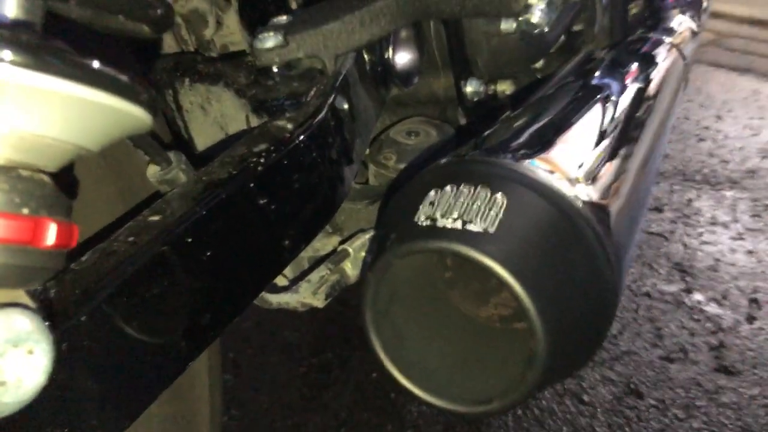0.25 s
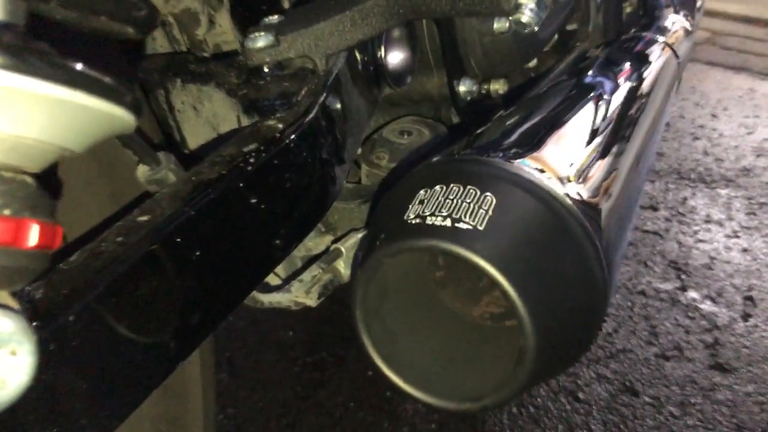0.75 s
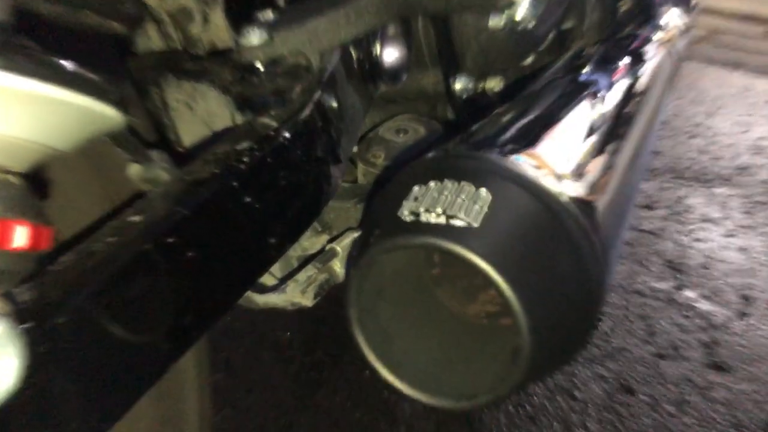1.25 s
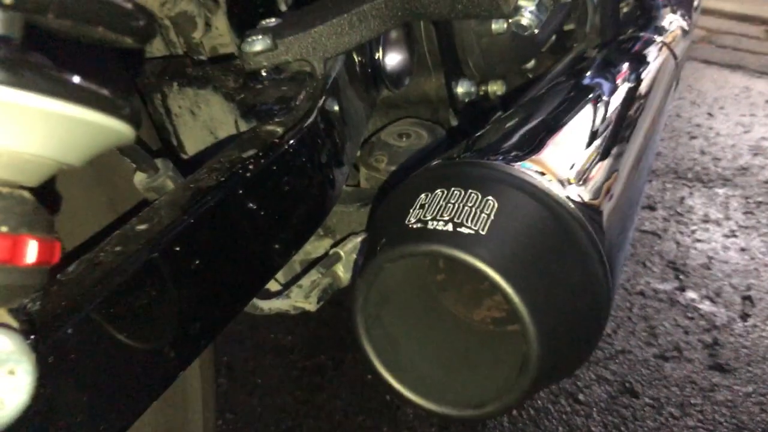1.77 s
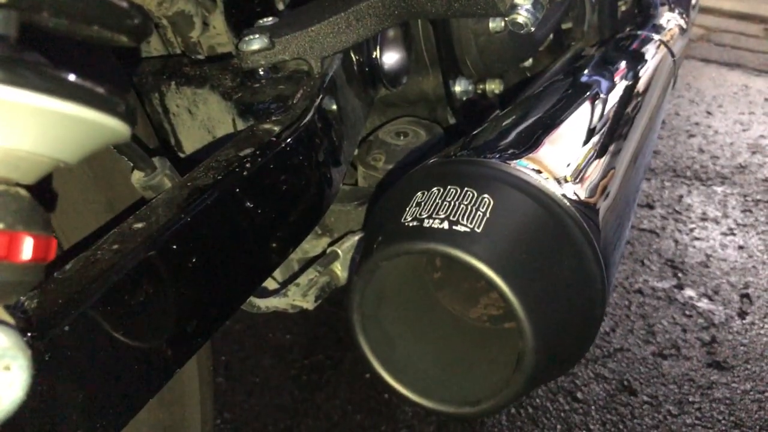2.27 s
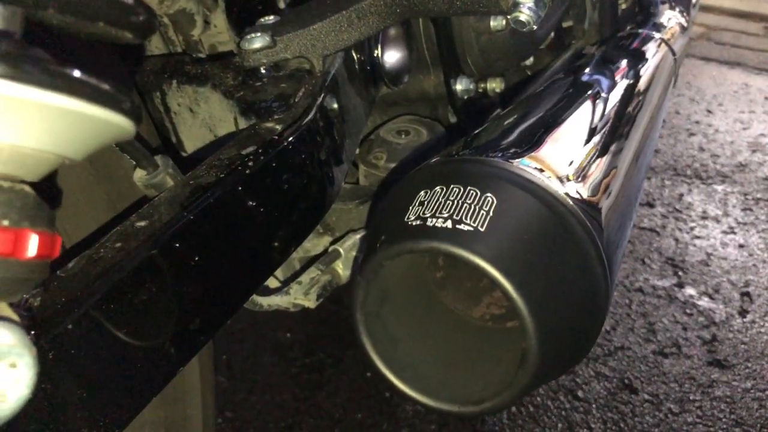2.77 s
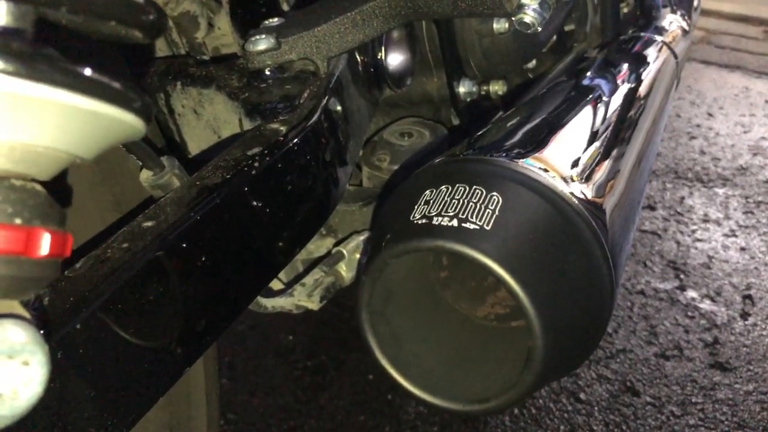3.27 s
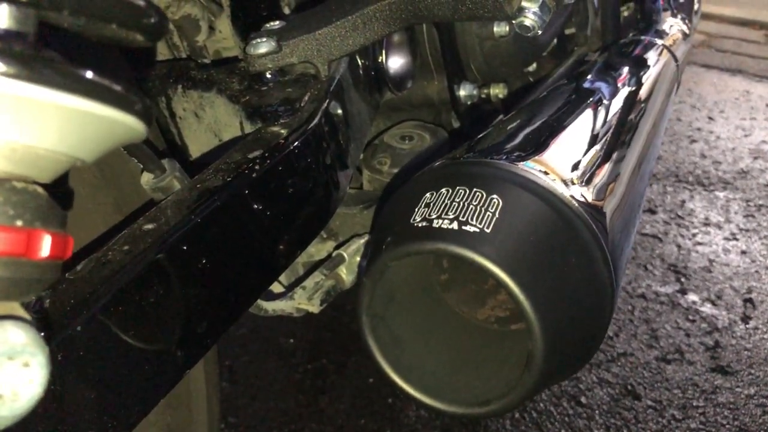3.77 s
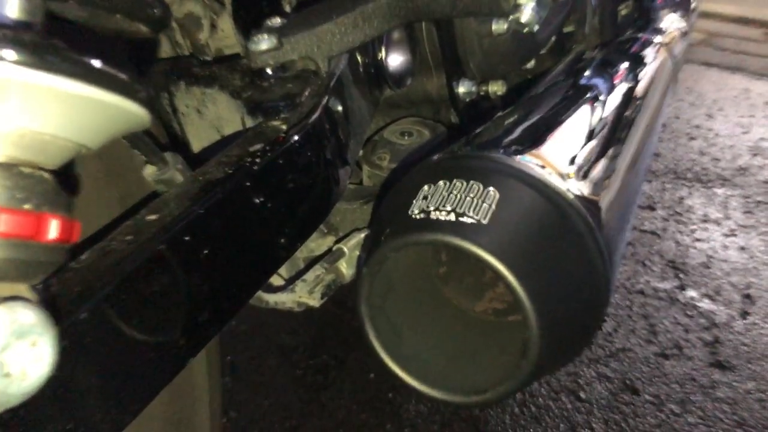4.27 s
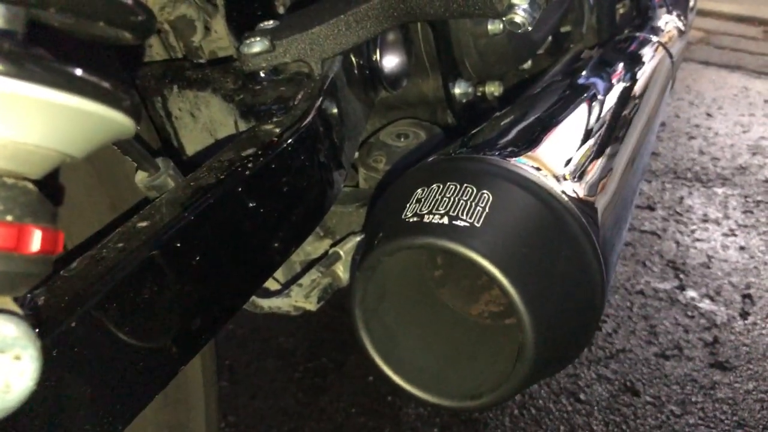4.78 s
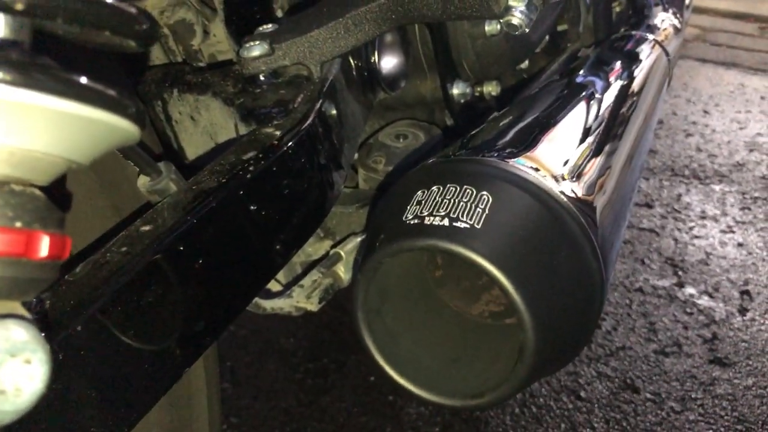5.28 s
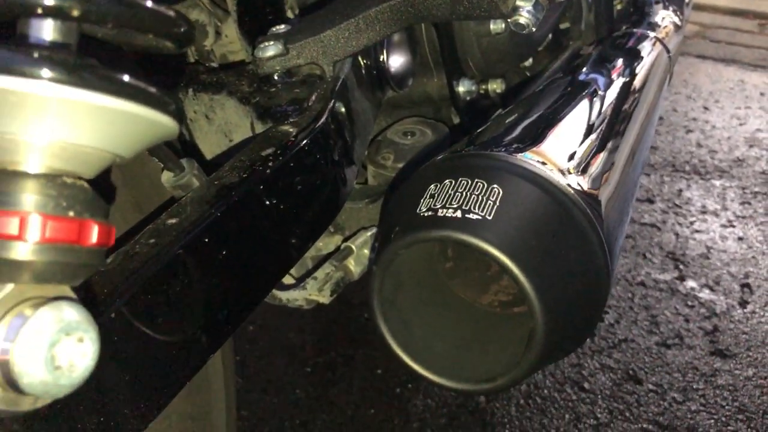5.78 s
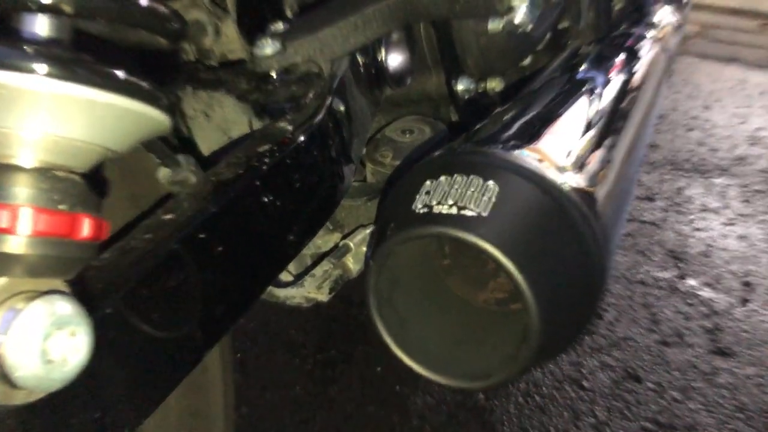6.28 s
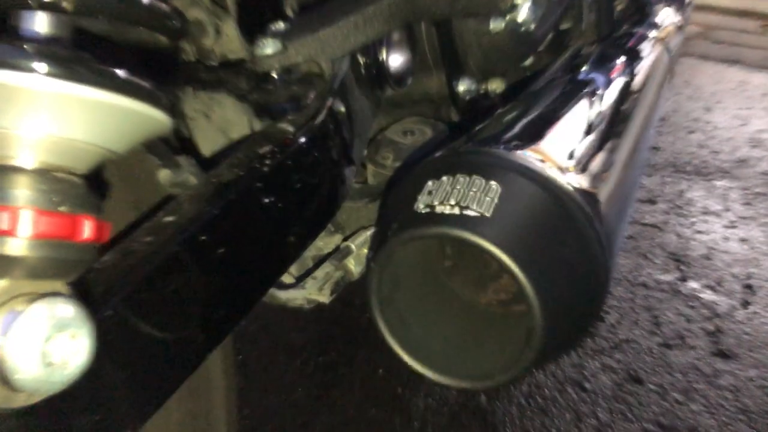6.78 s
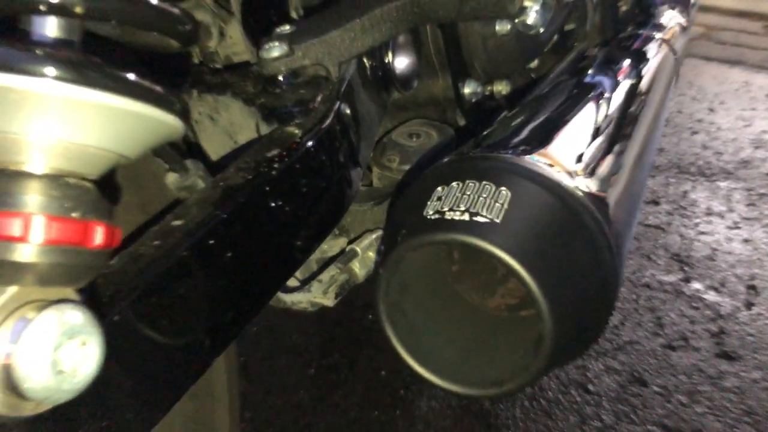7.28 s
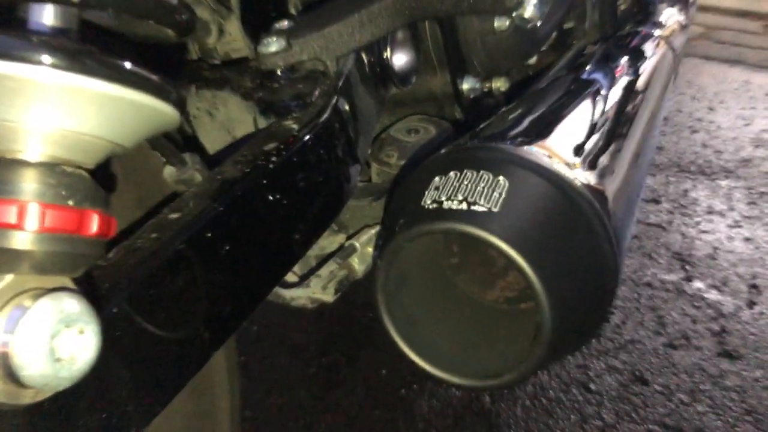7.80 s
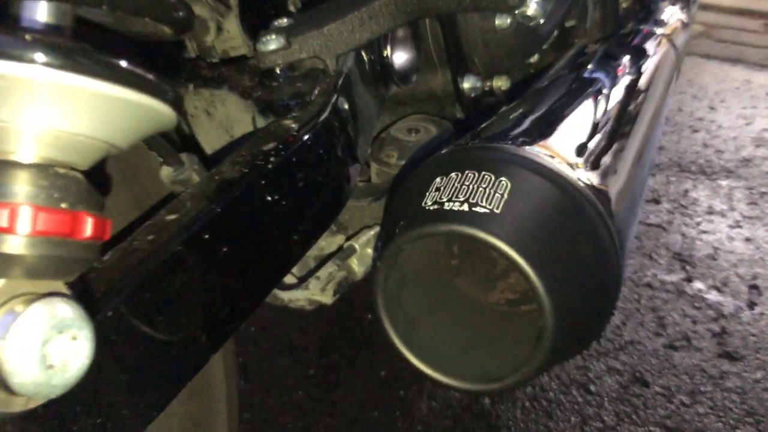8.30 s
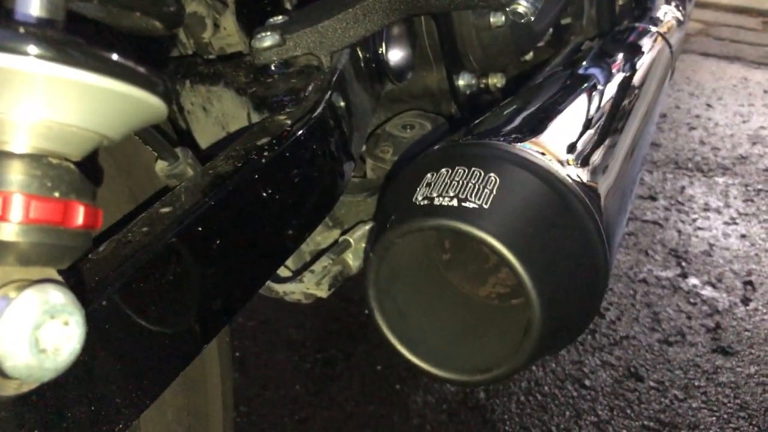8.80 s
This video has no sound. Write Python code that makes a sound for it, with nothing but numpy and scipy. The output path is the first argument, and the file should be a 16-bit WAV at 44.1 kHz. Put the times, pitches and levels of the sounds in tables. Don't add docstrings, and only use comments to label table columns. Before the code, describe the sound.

A V-twin motorcycle is heard from just behind its exhaust outlet, outdoors on pavement. Two quick rev blips come first, the second higher and falling away in uneven pops. It settles into a slow, loping idle, then gets a third blip, more idle, and a long fourth and a fifth rev close together. Deep thumps mix with raspy hiss; the nearby phone microphone rounds off the loudest peaks.

```python
import sys
import numpy as np
from scipy import signal
from scipy.fft import rfft, irfft, next_fast_len
from scipy.io import wavfile
from scipy.ndimage import uniform_filter1d, map_coordinates

SR = 44100
rng = np.random.default_rng(int(sys.argv[2]) if len(sys.argv) > 2 else 0)


def magnitude_from_level(level_db):
    exponent = np.asarray(level_db, float) / 20
    return 10 ** exponent


def transcribe(signal):
    frames = np.atleast_2d(signal).T
    limited = np.clip(frames, -1, 1)
    pcm = np.round(limited * 32767).astype(np.int16)
    wavfile.write(sys.argv[1], SR, pcm)


N = 399105
IDLE, OPEN, COASTING = 0, 1, 2


def unit(x):
    return x / np.sqrt(np.mean(x ** 2) + 1e-20)


def wobble(rate):
    knots = rng.standard_normal(int(N * rate / SR) + 4)
    return map_coordinates(knots, [np.arange(N) * rate / SR])


def filtered(x, response):
    m = next_fast_len(N + SR // 2)
    return irfft(rfft(x, m) * response(np.fft.rfftfreq(m, 1 / SR)), m)[..., :N]


def resonance(f, hz, width):
    return 1j * f * width / (hz * hz - f * f + 1j * f * width)


def modes(f, table):
    return sum(magnitude_from_level(db) * resonance(f, hz, width) for hz, width, db in table)


def hiss(spectrum):
    hz, db = np.transpose(spectrum)

    def colour(f):
        return magnitude_from_level(np.interp(np.log(f + 1), np.log(hz), db, -120, -120))
    return unit(filtered(rng.standard_normal(N), colour))


def train(times, sizes):
    return np.bincount(np.clip(np.round(times * SR).astype(int), 0, N), sizes, N + 1)[:N]


def puffs(times, sizes, rise, fall):
    t = np.arange(SR // 8) / SR
    shape = (1 - np.exp(-t / rise)) ** 2 * np.exp(-t / fall)
    return np.abs(signal.fftconvolve(train(times, sizes), shape / shape.max())[:N])


# [time_s, cycles_hz]
FIRST_REV = [(0.011, 10.94), (0.211, 10.02), (0.391, 20.6), (0.751, 21.56), (0.828, 18.75)]
SECOND_REV = [(0.828, 20.02), (1.029, 30.33), (1.788, 16.15), (1.95, 15.49), (2.028, 13.08), (2.129, 14.36),
              (2.309, 11.2), (2.784, 9.6)]
IDLING = [(2.784, 9.17), (3.084, 9.92), (3.163, 9.22), (3.524, 9.01), (3.962, 9.61)]
THIRD_REV = [(3.962, 8.96), (4.142, 19.31), (4.563, 16.64), (4.924, 12.42), (5, 14.94), (5.08, 11.82),
             (5.54, 9.76), (6.014, 9.49)]
FOURTH_REV = [(6.014, 9.55), (6.154, 12.13), (6.515, 24.87), (6.594, 26.25), (6.794, 24.77), (7.135, 17.43),
              (7.262, 21.67)]
FIFTH_REV = [(7.262, 18.48), (7.521, 28.01), (8.244, 16.31), (8.621, 12.54), (8.7, 14.49), (8.803, 10.75),
             (9.1, 10.55)]
REAR_CYCLES = 315 / 720


def firings():
    front = []
    for stretch in (FIRST_REV, SECOND_REV, IDLING, THIRD_REV, FOURTH_REV, FIFTH_REV):
        s, hz = np.transpose(stretch)
        t = np.arange(s[0], s[-1], 1 / SR)
        turned = np.cumsum(np.interp(t, s, hz)) / SR
        whole = round(turned[-1])
        front.append(np.interp(np.arange(whole), turned * whole / turned[-1], t))
    front = np.append(np.concatenate(front), s[-1])
    rear = map_coordinates(front, [np.arange(len(front) - 1) + REAR_CYCLES], mode="nearest")
    return np.ravel(np.c_[front[:-1], rear]), np.repeat(np.diff(front), 2)


# [start_s, end_s, pop_thump_db, front_thump_db]
COASTS = [
    (.435, .72, -4.5, -17),
    (1.015, 1.085, -12, -7),
    (1.225, 1.85, -3, -23),
    (4.18, 4.6, -6.5, -16),
    (6.63, 7.09, -3.5, -22.5),
    (7.525, 8.22, -2, -24.5),
]


def idle_burns(times, cycle):
    over_hz = np.maximum(1 / cycle - 9.15, 0)
    thump_db = np.maximum(-12 - 2 * over_hz, -18)
    jet_db = np.maximum(-14.5 - 8 * over_hz, -32.5)
    level_age_s = 1.1
    ended = np.append(-level_age_s, np.transpose(COASTS)[1])
    age = times - ended[np.searchsorted(ended, times) - 1] - level_age_s
    return thump_db + 2 * age, jet_db + 3.5 * age


# [opens_s, shuts_s, jet_db, front_thump_db, rear_thump_db]
BLIPS = [
    (0.196, .435, -0.5, -9, -4),
    (0.799, 1.015, -2, -0.5, -33),
    (1.045, 1.225, -8, -11.5, -17.5),
    (3.935, 4.18, -1.5, -8.5, -7.5),
    (6.012, 6.63, -3, -6.5, -5.5),
    (7.241, 7.525, -5.5, -8, -12),
]
# [thump_db, jet_db]
SCATTER_DB = [(.7, .8), (1.2, 1), (1.8, 2.5)]
# [time_s, thump_db]
POPS = [(.61, -5.5), (.658, -8), (.705, -4), (1.04, -18), (1.255, -7), (1.293, -1.5), (1.335, 0),
        (1.418, -4), (1.505, -9), (1.555, -6), (1.606, -11.5), (1.658, -9.5), (1.713, -8), (1.834, -7),
        (4.295, -5), (4.583, -9.5), (6.68, -4), (6.718, -4), (6.798, -6.5), (6.928, -6.5), (7.024, -6.5),
        (7.077, -6.5), (7.534, -22), (7.81, -4.5), (7.897, -7.5), (7.944, -12.5), (7.995, -6), (8.042, -9),
        (8.151, -7.5), (8.21, -9)]
# [time_s, thump_db, jet_db]
ODD = [(.051, -12, -21.5), (.512, -7, -29), (.563, -8, -22), (.73, -13, -38), (.797, -12, -16),
       (1.375, -5, -16), (1.46, -19, -22), (1.485, -4, -15), (1.532, -16, -16), (1.746, -8, -20),
       (2.075, -18.5, -23), (2.145, -15.5, -25), (3.251, -15.5, -27), (3.47, -14.5, -22), (4.408, -13, -26),
       (4.464, -4, -13.5), (4.749, -14.5, -27), (5.043, -17, -30), (5.08, -12, -28), (5.85, -14.5, -23),
       (6.972, -11.5, -20), (7.161, -20, -21.5), (7.215, -15.5, -30), (7.769, -12, -20), (7.851, -4, -17.5),
       (7.922, -16, -23), (8.071, -12, -30), (8.126, -12, -23), (8.303, -14.5, -28), (8.509, -18, -18)]
# [time_s, thump_db, jet_db]
UNEVEN = [(.372, -14, -4), (.421, -0.5, -5.5), (.828, -2.5, -5), (.849, -15, -11), (.956, -28, -2),
          (.973, -13, -5.5), (.991, -22, -6.5), (1.007, -7, -6), (1.025, -2.5, -25), (1.059, -17, -17),
          (1.869, -13, -24), (1.897, -14, -28), (3.143, -14, -19.5), (3.361, -12, -16), (3.534, -12, -17),
          (4.002, -4, -8), (4.167, -8, -3.5), (5.64, -12.5, -14), (5.75, -11.5, -14), (5.955, -10.5, -11.5),
          (6.147, -7, -5.5), (6.42, -3.5, -10.5), (6.484, -4, -12), (6.622, -32, -18), (6.641, -2.5, -16.5),
          (7.313, -6, -5.5), (7.483, -9, -8.5), (7.517, -16, -16), (7.574, -3.5, -20)]
MISFIRES = [.146, .749, 1.772, 2.106, 2.178, 2.727, 4.522, 4.645, 5.165, 5.345, 7.185, 7.236, 8.095, 8.269,
            8.439, 8.541, 8.859, 9.046]


def crank():
    times, cycle = firings()
    rear = np.arange(len(times)) % 2 == 1
    thump_db, jet_db = idle_burns(times, cycle)
    state = np.zeros(len(times), int)

    opening_s = 0.095
    for opens, shuts, db, front_db, rear_db in BLIPS:
        on = (times >= opens) & (times < shuts)
        since = times - opens - opening_s
        jet_shape_db = np.where(since < 0, 8.5 * since / opening_s, -15.5 * since)
        thump_shape_db = np.where(since < 0, 1.5 * since / opening_s, -10 * since)
        thump_db[on] = (np.where(rear, rear_db, front_db) + thump_shape_db)[on]
        jet_db[on] = (db + jet_shape_db - 2 * rear)[on]
        state[on] = OPEN
    for start, end, pop_db, front_db in COASTS:
        shut = (times >= start) & (times < end)
        state[shut] = COASTING
        thump_db[shut] = np.where(rear, pop_db, front_db)[shut]

    chance = rng.standard_normal((len(times), 2))
    thump_chance, jet_chance = (np.array(SCATTER_DB)[state] * chance).T
    thump_db = thump_db + thump_chance
    for s, pop_db in POPS:
        thump_db[np.argmin(np.abs(times - s))] = pop_db
    coasting_db = np.where(rear, thump_db - 13, 0.72 * thump_db - 10)
    jet_db = np.where(state == COASTING, coasting_db, jet_db) + jet_chance
    for _, shuts, db, *_ in BLIPS:
        late = (times >= shuts) & (times < shuts + 0.045)
        jet_db[late] = np.maximum(jet_db[late], db - 10.5)
    for burns in (ODD, UNEVEN, [(s, -23, -60) for s in MISFIRES]):
        for s, odd_db, odd_jet_db in burns:
            k = np.argmin(np.abs(times - s))
            thump_db[k], jet_db[k] = odd_db, odd_jet_db
    return times, thump_db, jet_db, cycle, state


OPEN_RASP_DB = [5.5, 3.9, 5, 4, 4.4, 4.3]
OPEN_FLUTTER_DB = [6, -3, 9, 7, 1.5, -7]


def flow(times, thump_db, cycle, state):
    off_hz = 1 / cycle - 12.4
    stir_db = (state == COASTING) * (thump_db + 25.5)
    blip = np.maximum(np.searchsorted(np.transpose(BLIPS)[0], times) - 1, 0)

    def curve(db, below_db_per_hz, above_db_per_hz, open_db, stirs):
        speed_db = np.maximum(below_db_per_hz * off_hz, above_db_per_hz * off_hz)
        throttle_db = np.take(open_db, blip) * (state == OPEN)
        level_db = db + speed_db + throttle_db + stirs * stir_db
        return np.interp(np.arange(N) / SR, times + 0.0073, level_db)
    rasp_db = curve(-38, -1.48, 0.91, OPEN_RASP_DB, stirs=0.12)
    flutter_db = curve(-45, -1, 0.5929, OPEN_FLUTTER_DB, stirs=0.54)
    return rasp_db, flutter_db


# [pitch_hz, level_db]
FLUTTER = [(1290, -44), (2200, -46), (2470, -7), (3360, 2.5), (4180, 0.5), (4890, -8), (6940, -3),
           (12400, -17.5), (14900, -13), (16100, -16)]


def flutter(times, db):
    ones = np.ones(len(times))
    pump = 0.35 + puffs(times - 0.002, ones, rise=0.002, fall=0.005)
    pump = pump + 0.6 * puffs(times + 0.0145, ones, rise=0.002, fall=0.004)
    pump = pump / np.sqrt(np.abs(uniform_filter1d(pump ** 2, size=SR // 8)))
    lumps = magnitude_from_level(2.5 * wobble(110) + 2.5 * wobble(300))
    return magnitude_from_level(db - 2.5) * unit(pump * lumps * hiss(FLUTTER))


# [pitch_hz, width_hz, level_db]
BAFFLE = [(376, 108, 4), (646, 138, 1.5), (1010, 250, -8), (1649, 106, -1), (2150, 77, -15)]


def rasp(times, thump_db, jet_db, rasp_db):
    kick = magnitude_from_level(0.09 * thump_db + 0.2 * jet_db)
    kick = kick / uniform_filter1d(kick, size=5)
    gate = 0.78 + puffs(times, kick, rise=0.001, fall=0.0026)
    gate = gate + 0.2 * puffs(times + 0.0138, kick, rise=0.00092, fall=0.0048)
    gate = gate / np.sqrt(np.abs(uniform_filter1d(gate ** 2, size=SR // 6)))
    noise = gate * magnitude_from_level(2.9 * wobble(150)) * rng.standard_normal(N)
    rung = filtered(noise, lambda f: modes(f, BAFFLE) * resonance(f, 564, 1550))
    return magnitude_from_level(rasp_db - 4.0) * unit(rung)


# [pitch_hz, level_db_per_hz]
SOFT_JET = [(1290, -5.5), (2200, -4.5), (2470, -14.5), (3150, -1.5), (4330, -5), (5650, -10), (6740, 0),
            (8370, 2), (10200, -6), (11900, -5), (15200, -12.5), (16200, -20)]
HARD_JET = [(410, 1.5), (700, -3), (1750, -10), (2610, -15), (3360, -12), (5080, -14), (13100, -14.5),
            (15500, -18.5), (16800, -55)]
# [delay_s, level_db]
ECHOES = [(0.0158, -7), (.035, -20), (0.052, -29)]


def jet(times, db, cycle):
    speed = np.clip((0.088 - cycle) / 0.025, 0, 1)
    size = magnitude_from_level(db - 5.0)
    out = np.zeros(N)
    for colour, share, fall in ((SOFT_JET, 1 - speed, 0.0018), (HARD_JET, speed, 0.0012)):
        burst = puffs(times - 0.0022, share * size, rise=0.0014, fall=fall)
        burst = burst + puffs(times, share * size * magnitude_from_level(-15), rise=0.0032, fall=0.0054)
        for s, echo_db in ECHOES:
            scatter_db = 5.6 * rng.standard_normal(len(times))
            echo = share * np.sqrt(size) * magnitude_from_level(echo_db - 17.5 + scatter_db)
            burst = burst + puffs(times + s - 0.002, echo, rise=0.0011, fall=0.00065)
        out += burst * magnitude_from_level(2.06 * wobble(500)) * hiss(colour)
    return out


# [pitch_hz, width_hz, level_db]
BARK = [(249.5, 18, 11.5), (319, 25, 7), (450, 130, 1), (570, 220, -12), (938, 1200, -8.5)]


def bark(times, thump_db, jet_db, cycle):
    speed = np.clip((0.1 - cycle) / 0.03, 0, 1)
    sizes = speed * magnitude_from_level(0.67 * thump_db + 0.5 * jet_db + 27.5)

    def cans(f):
        out = 0
        for hz, width, db in BARK:
            late = np.exp(-2j * np.pi * f * 1.5 / hz)
            out = out + magnitude_from_level(db) * resonance(f, hz, width) * late
        return out * resonance(f, 600, 700)
    return filtered(train(times + 0.00095, sizes), cans)


# [pitch_hz, width_hz, level_db]
POP_PIPE = [(188, 126, -1.5), (305, 120, -6), (566, 245, 1.5)]


def pops(times, thump_db, cycle, state):
    early = (state == OPEN) * (cycle > 0.07)
    sizes = ((state == COASTING) + magnitude_from_level(3) * early) * magnitude_from_level(2.06 * thump_db + 25.5)

    def pipe(f):
        dull = 1 / (1 + 1j * f / 610) ** 3
        sweep = np.exp(-2j * np.pi * 0.7 * np.log(1 + f / 100))
        return modes(f, POP_PIPE) * dull * sweep
    return -filtered(train(times + 0.0045, sizes), pipe)


# [pitch_hz, width_hz, level_db]
SLOW_PIPE = [(76.7, 30, 0.5), (76, 12.94, 4.5), (117.6, 11.3, -15), (159.7, 14.8, -8.5), (191, 7, -14),
             (219.4, 12.5, -8.5), (277.6, 29.5, -24.5)]
BRISK_PIPE = [(71.6, 16.6, -3.5), (102.6, 33.8, -4.5), (147.6, 81, -9), (213.6, 11, -19)]
FAST_PIPE = [(63.5, 42, -13.5), (103, 56.7, -0.5), (132, 61.3, 1), (191.3, 40, -4.5), (248, 58, -15)]
BEAT_S = [.036, .052, .058, .076]
EVENING = [0.46, 0.61, 0.4]


def thump(times, db, cycle, state):
    fast = np.interp(cycle, BEAT_S, [1, 0, 0, 0])
    slow = np.interp(cycle, BEAT_S, [0, 0, 0, 1])
    brisk = 1 - slow - fast
    evening = np.take(EVENING, state)
    db = db + evening * (1 - slow) * (uniform_filter1d(db, size=3) - db)
    out = np.zeros(N)
    for pipe, share, lag_s in ((SLOW_PIPE, slow, -0.0022), (BRISK_PIPE, brisk, 0.0007),
                               (FAST_PIPE, fast, -0.0005)):
        scatter_db = (2 - 1.1 * slow) * rng.standard_normal(len(times))
        pulses = train(times + lag_s, share * magnitude_from_level(db + scatter_db + 55.5))

        def response(f):
            muffler = (330 ** 2 / (330 ** 2 - f * f + 400j * f)) ** 2
            return (modes(f, pipe[::2]) - modes(f, pipe[1::2])) * muffler
        out -= filtered(pulses, response)
    return out


def scene():
    times, thump_db, jet_db, cycle, state = crank()
    rasp_db, flutter_db = flow(times, thump_db, cycle, state)
    gas = flutter(times, flutter_db) + rasp(times, thump_db, jet_db, rasp_db) + jet(times, jet_db, cycle)
    pulses = bark(times, thump_db, jet_db, cycle) + pops(times, thump_db, cycle, state)
    pulses = pulses + thump(times, thump_db, cycle, state)
    return (gas + pulses)[None]


def roll_off(x):
    return signal.sosfilt(signal.butter(12, 16970, fs=SR, output="sos"), x)


def record(dry):
    x = filtered(dry, lambda f: (resonance(f, 41, 30) * 1j * f / 30) ** 2)
    x = x / (1 + np.abs(x / 0.72) ** 5) ** (1 / 5)
    x = filtered(x, lambda f: f < 16800)
    return roll_off(x)


dry = scene()
out = record(dry)
transcribe(out)
```